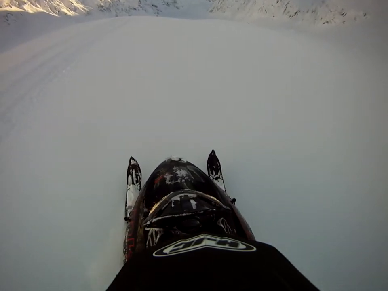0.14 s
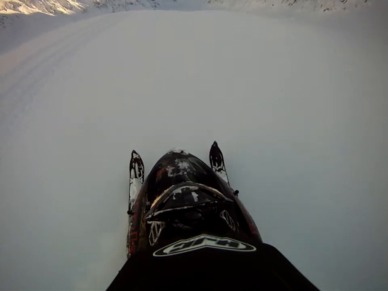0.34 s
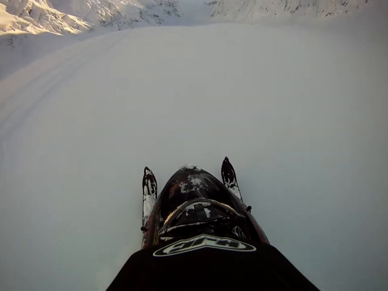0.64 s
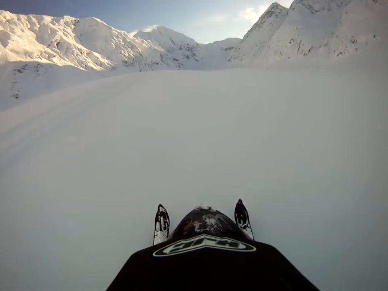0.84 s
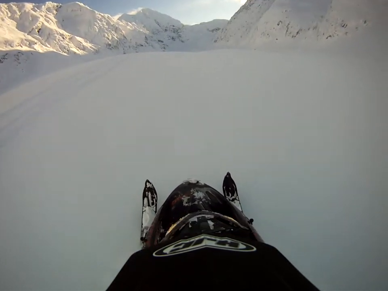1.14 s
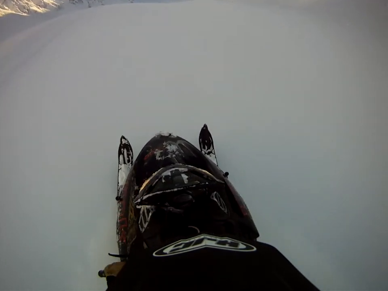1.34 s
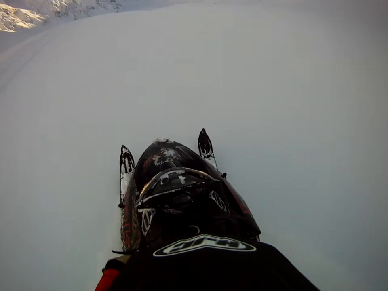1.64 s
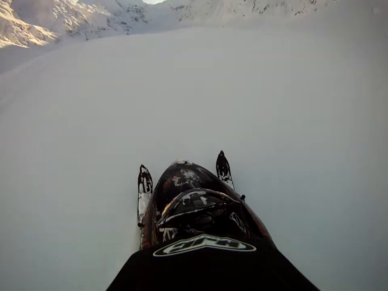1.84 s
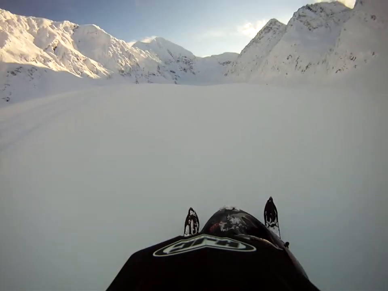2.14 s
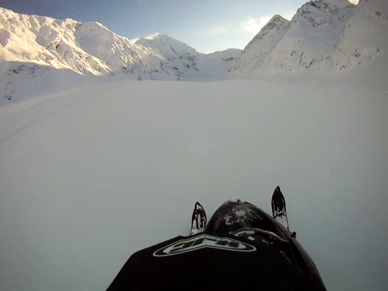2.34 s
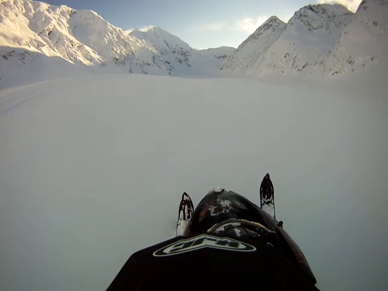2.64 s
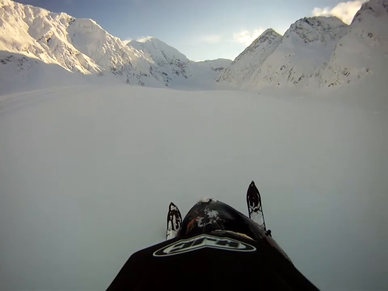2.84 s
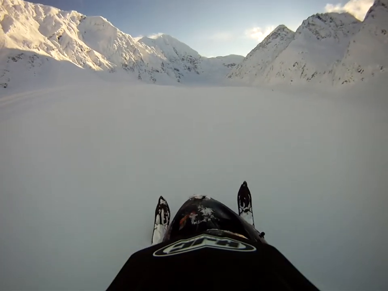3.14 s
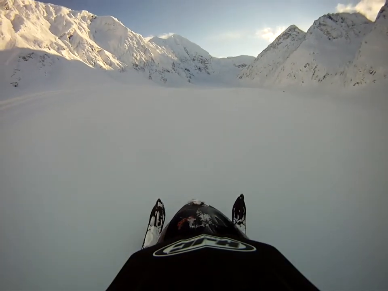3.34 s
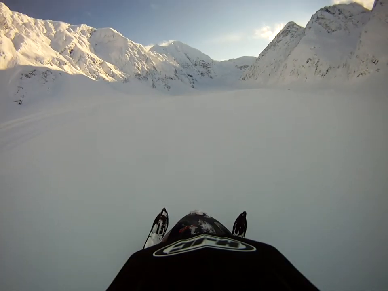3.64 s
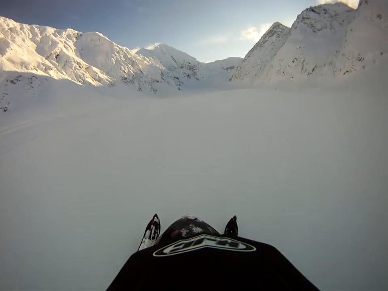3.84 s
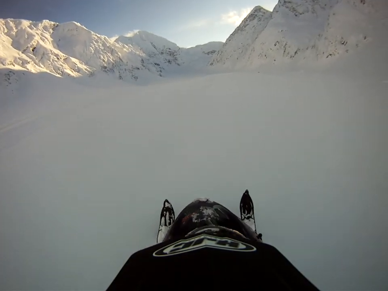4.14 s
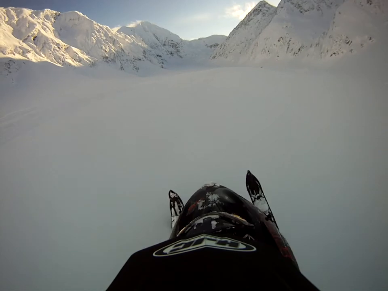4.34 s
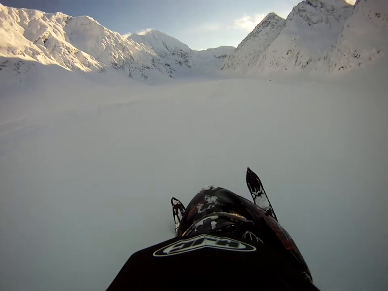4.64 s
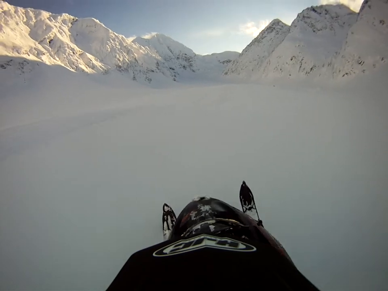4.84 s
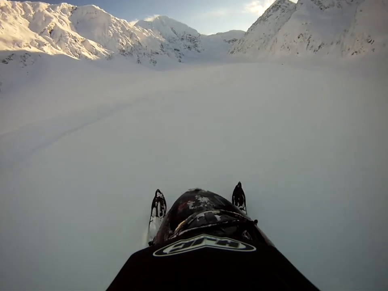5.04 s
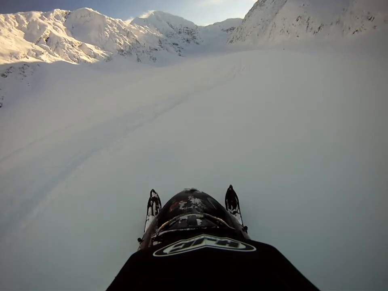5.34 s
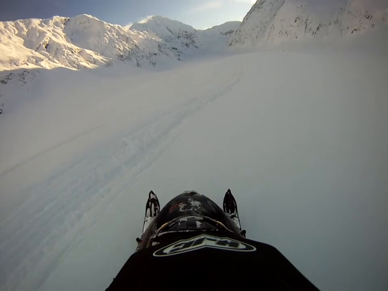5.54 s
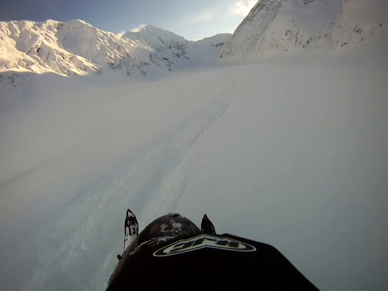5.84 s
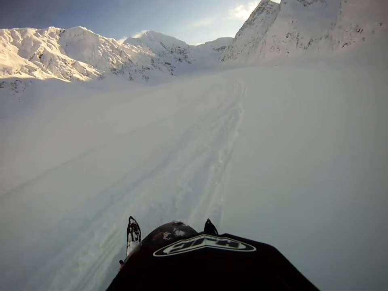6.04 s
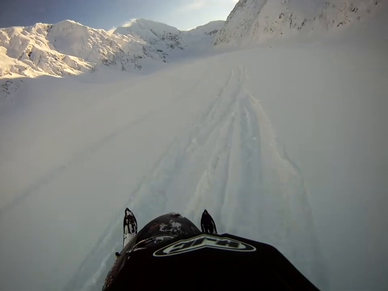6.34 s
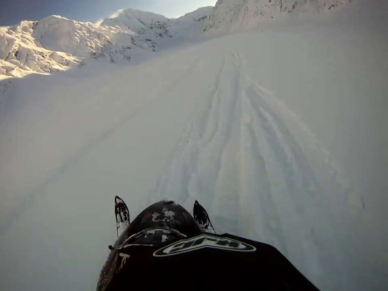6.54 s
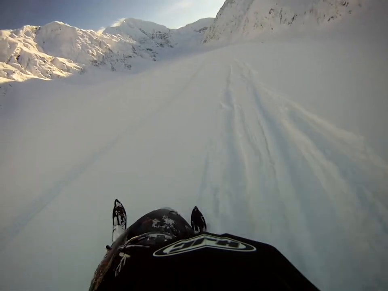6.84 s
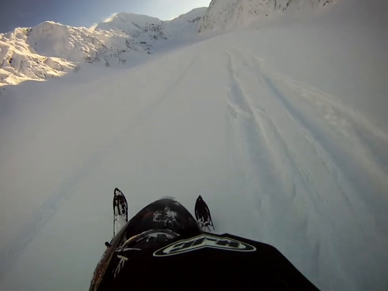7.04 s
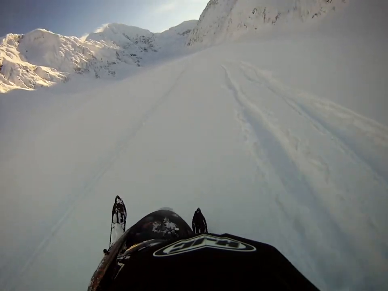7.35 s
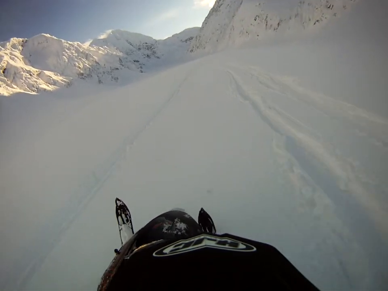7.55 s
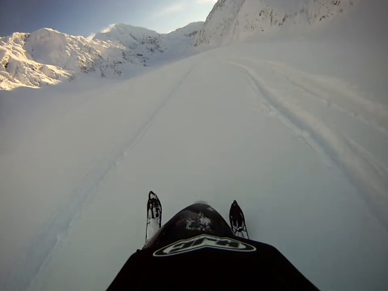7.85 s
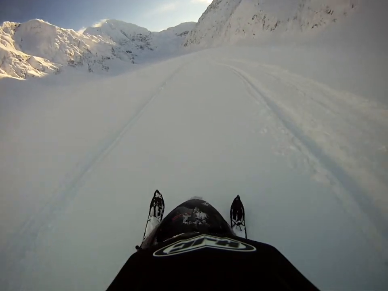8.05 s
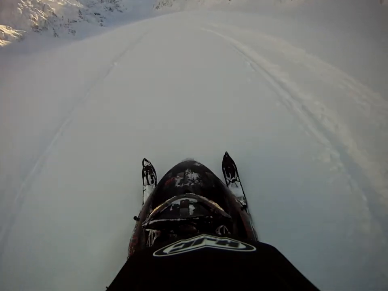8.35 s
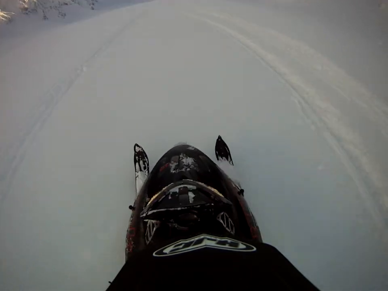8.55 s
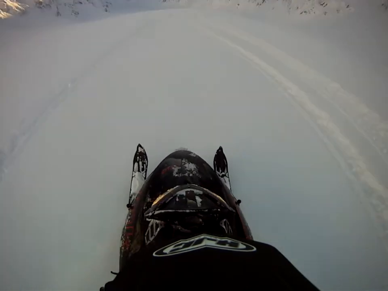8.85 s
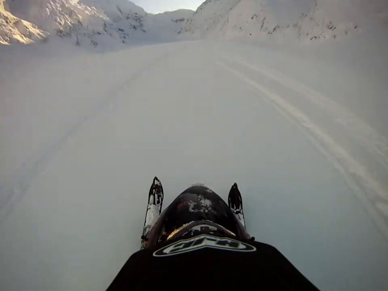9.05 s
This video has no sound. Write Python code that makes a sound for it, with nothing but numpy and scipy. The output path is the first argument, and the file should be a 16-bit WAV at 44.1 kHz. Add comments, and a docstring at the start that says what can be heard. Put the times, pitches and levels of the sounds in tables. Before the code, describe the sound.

A two-stroke snowmobile engine drones and howls at high revs, close to a small cased helmet camera. It surges higher, then the throttle snaps shut and the pitch dips with a quick rattle of knocks. It recovers unevenly and climbs again to a strained whine. Gas and track roar and low wind thumps run underneath, in open snowy mountains.

```python
"""A two-stroke twin snowmobile climbs at high revs; the microphone is a small cased camera on the rider's helmet.
From the start: crank orders drone and howl, firings ring the case near 1.5 kHz, gas and track roar, wind thumps.
At 2.4 s the throttle opens and the revs rise; at 4.7 s it snaps shut, the engine dips, and lone firings knock.
The revs sag, recover, and from 7.4 s climb again towards full throttle.
Throughout, the camera samples slowly and holds each sample, which mirrors the sound into the treble."""
import sys
import numpy as np
from scipy import signal
from scipy.fft import rfft, irfft
from scipy.io import wavfile
from scipy.ndimage import uniform_filter1d

SR = 44100
rng = np.random.default_rng(int(sys.argv[2]) if len(sys.argv) > 2 else 0)


def wrap_up_sound(samples):
    """Save the sound to the file named by the first command line argument, as 16-bit audio."""
    columns = np.atleast_2d(samples).T
    # keep every value between -1 and 1, then stretch to whole-number steps
    tamed = np.clip(columns, -1, 1)
    steps = np.round(tamed * 32767).astype(np.int16)
    wavfile.write(sys.argv[1], SR, steps)


N = 404838  # length in samples


def undb(db):
    """Gain of a level in dB."""
    return 10 ** (np.asarray(db) / 20)


def seconds():
    """Time of every sample."""
    return np.arange(N) / SR


def curve(table):
    """Second column of a table, drawn as straight lines over its times."""
    t, values = np.transpose(table)
    return np.interp(seconds(), t, values)


def colour_db(points, hz):
    """Level of a spectrum at given frequencies, interpolated over log frequency."""
    f, db = np.transpose(points)
    return np.interp(np.log(np.maximum(hz, 1)), np.log(f), db)


def coloured(x, points):
    """Filter by a spectrum, then scale to rms 1."""
    hz = np.arange(N // 2 + 1) * SR / N
    y = irfft(rfft(x) * undb(colour_db(points, hz)), N)
    return y / np.sqrt(np.mean(y ** 2))


def walk(rate):
    """Random values, one each 1 / rate s, joined by straight glides; spread about 1.4."""
    step = int(SR / rate)
    held = np.repeat(rng.standard_normal(N // step + 1), step)
    return 1.7 * uniform_filter1d(held, step)[:N]


def bump(middle, length):
    """A smooth rise and fall, 1 at the middle, 1/e half a length away."""
    return np.exp(-(2 * (seconds() - middle) / length) ** 2)


def plateau(middle, length):
    """Ramp up over a quarter of the length, hold for half, ramp down."""
    return np.clip(2 - 4 * np.abs(seconds() - middle) / length, 0, 1)


def by_throttle(throttle, levels_db):
    """Blend the eased, cruising and wide-open levels."""
    return np.interp(throttle, (0, .5, 1), levels_db)


# Crankshaft speed: t/s, rate/(turns per s)
SHAFT_RATE = [(0, 122), (.25, 120.8), (.85, 121.7), (1.2, 120.9), (1.65, 121.2), (1.98, 120.2),
              (2.3, 122.3), (2.43, 124), (2.61, 129), (2.75, 130.5), (2.95, 131.2), (3.07, 130.8),
              (3.24, 128.9), (3.4, 128.5), (3.72, 129.8), (3.9, 127.2), (4.08, 121.3), (4.27, 119.4),
              (4.66, 121.8), (4.7, 115), (4.78, 108.8), (4.89, 102), (4.96, 101.6), (5.17, 110.5),
              (5.37, 114.3), (5.55, 115.6), (5.79, 114.6), (5.96, 118), (6.15, 120), (6.34, 117.8),
              (6.75, 122), (7.22, 124), (7.4, 129.2), (7.62, 132.6), (7.85, 131.4), (8.05, 134.3),
              (8.18, 134.6), (8.4, 131.4), (8.55, 130.8), (8.87, 133.2), (9.18, 133.1)]


def crankshaft():
    """Turns per second, and the crank angle in radians that they add up to."""
    hz = curve(SHAFT_RATE)
    return hz, 2 * np.pi * np.cumsum(hz) / SR


# Throttle: t/s, opening (0 eased, .5 cruising, 1 wide open)
THROTTLE_OPENING = [(0, 0.53), (1.15, 0.55), (1.7, 0.48), (2.0, .52), (2.37, 0.58), (2.43, 0.93),
                    (3.0, 0.94), (3.3, 0.97), (3.75, 1), (3.93, 0.88), (4.02, 0.5), (4.45, 0.57),
                    (4.67, 0.25), (4.71, 0.063), (6.55, .02), (6.7, 0.39), (7.05, 0.32), (7.4, 0.86),
                    (7.62, 0.54), (7.86, 0.7), (7.93, 0.96), (8.05, 1), (8.25, 0.82), (8.6, 0.88),
                    (9.18, 0.93)]


def throttle_opening():
    """How far the throttle is open; it sets the balance of the engine and the wind rush."""
    return curve(THROTTLE_OPENING)


# Roar and wind drop together, firings less: middle t/s, length t/s, depth of the roar's drop level/dB
LULL_DIPS = [(3.85, 0.23, -4), (5.23, 0.15, 0), (5.5, 0.24, -0.5), (8.156, 0.27, -6)]


def lulls():
    """Level change in dB of the brief lulls."""
    return sum(db * bump(middle, length) for middle, length, db in LULL_DIPS)


def partial(angle, order, db, waver_db=0.5, slip=0.13, spread=0.65):
    """One multiple of the shaft rate; uneven burning makes its size and phase (slip, spread in rad) waver."""
    # even orders near the case resonance line up into one smeared pulse a firing; odd orders keep no such step
    smear = np.pi - .07 * (order - 12) ** 2
    phase = smear + spread * rng.standard_normal()
    phase = phase + (order % 2) * rng.uniform(0, 2 * np.pi)
    size = np.sqrt(2) * undb(db + waver_db * walk(25))
    return size * np.cos(order * angle + slip * walk(25) + phase)


# The multiples of the shaft rate that stand out
LOUD_ORDERS = (1, 2, 4, 6, 8, 10, 11, 12, 14, 15, 16, 18, 22, 24)
# One row per loud order, before wander and swells: eased level/dB, cruising level/dB, wide-open level/dB
LOUD_ORDER_LEVELS = [(-54, -52, -50.1), (-34.5, -32, -42.5), (-35.5, -35.5, -34.5), (-42.5, -40, -39),
                     (-48, -44, -30), (-38, -32, -22), (-39, -32, -27.6), (-34, -21.5, -14),
                     (-32.5, -34.5, -18), (-45, -24.5, -37.5), (-33, -29, -29), (-37, -38, -24),
                     (-44, -44, -32.5), (-52.9, -45.5, -26.5)]
# One order swells or fades for a moment: middle t/s, length t/s, order, change level/dB
ORDER_SWELLS = [(.95, 1.2, 12, 2.5), (1.7, .64, 16, -11), (1.994, 0.29, 12, 2), (2.295, 0.82, 4, -6),
                (2.33, .25, 2, -5), (2.33, .15, 12, -5.5), (2.46, 0.25, 8, 4.5), (2.47, .2, 24, 3),
                (2.62, 0.26, 16, 5), (2.48, .68, 6, 6.5), (2.756, 1.27, 14, -6.5), (2.78, 1.8, 18, -8),
                (2.9, 0.88, 4, 4.5), (2.92, 0.54, 1, 7), (2.97, .3, 24, 5), (3.24, 0.28, 24, -5),
                (3.3, 0.46, 6, 3.5), (3.496, 0.52, 12, -4), (3.58, 0.52, 24, 2), (3.6, 0.77, 22, -14),
                (3.616, 0.3, 8, 6.5), (3.66, .35, 2, 5), (3.83, 0.77, 18, -17), (3.876, 0.27, 10, -4),
                (3.89, 0.28, 11, -9), (3.888, 0.34, 16, -4), (4.003, 0.24, 2, -9), (4.122, 0.32, 14, -8),
                (4.29, .35, 12, 3), (4.49, .6, 15, -16), (4.52, .4, 14, 7), (4.55, 0.53, 6, 8.5),
                (4.57, 0.6, 4, 5), (4.695, .65, 2, -18), (4.8, 0.39, 1, 17), (4.84, .14, 15, 8),
                (4.88, .4, 6, -0.5), (4.94, .25, 11, 8), (4.93, .16, 14, -2), (4.987, 0.25, 4, -6),
                (5.057, .5, 12, -12), (5.155, 0.23, 6, 6.5), (5.17, 0.4, 14, 7.5), (5.32, 0.14, 16, 7),
                (5.75, 0.25, 14, 3.5), (6.1, 0.31, 16, 3), (6.3, 0.45, 6, -5), (6.402, 0.28, 2, 3),
                (6.447, 0.27, 4, 5), (6.53, 1.4, 11, -11), (6.72, .2, 12, 3.5), (6.86, 0.6, 16, 6),
                (7.02, 0.38, 6, 8.5), (7.22, .3, 2, -6), (7.339, 0.23, 18, 4), (7.4, 1.3, 10, -11),
                (7.416, 1.3, 12, -7), (7.546, 0.11, 14, 8), (7.623, 0.32, 1, 8), (7.67, .44, 11, -12),
                (7.703, 0.48, 12, -4), (7.78, .3, 14, 4), (7.786, 1.2, 2, -8), (7.883, 1.6, 6, -5.5),
                (8.12, .2, 18, -7), (8.147, 0.26, 24, -14), (8.17, .3, 2, -10), (8.19, .2, 4, -5),
                (8.3, 0.43, 10, -7), (8.38, 0.27, 12, -3), (8.548, .2, 6, 5), (8.547, 0.32, 2, 4.5),
                (8.72, .4, 16, -7), (8.9, 0.51, 11, -9), (9.11, .99, 24, -4.5)]


def tones(angle, throttle):
    """The strong orders: exhaust drone, howl of the case, whine at full throttle."""
    out = 0
    for order, levels_db in zip(LOUD_ORDERS, LOUD_ORDER_LEVELS):
        db = by_throttle(throttle, levels_db) + walk(4)
        for middle, length, which, change_db in ORDER_SWELLS:
            if round(which) == order:
                db = db + change_db * plateau(middle, length)
        out = out + partial(angle, order, db)
    return out


# Ring of the case under the firing pulses, relative: f/Hz, level/dB
FIRING_COLOUR = [(380, -21.5), (630, -23), (880, -21.5), (1130, -15.5), (1650, -8.5), (2150, -15),
                 (2450, -12.5), (2650, -24.5), (3000, -17), (3400, -22), (3700, -29), (4200, -31),
                 (4700, -27.5), (5200, -27.5), (5600, -28.5)]
# Firing strength, relative: eased level/dB, cruising level/dB, wide-open level/dB
FIRING_LEVELS = (-22, -17, -13)
# Base mismatch of the two cylinders: eased level/dB, cruising level/dB, wide-open level/dB
MISMATCH_LEVELS = (-3.5, -4, -8)
# The weaker orders rasp out together: middle t/s, length t/s, rise level/dB
RASP_RISES = [(2.88, 0.77, 6), (6.87, 0.23, 3), (7.98, 0.16, 5.5), (8.58, 1, 6)]


def firings(hz, angle, throttle, lull_db):
    """Two pulses a turn ring the case; odd orders come from the mismatch of the cylinders."""
    firing_db = by_throttle(throttle, FIRING_LEVELS) + 0.62 * lull_db
    firing_db = firing_db + sum(db * plateau(middle, length) for middle, length, db in RASP_RISES)
    mismatch_db = by_throttle(throttle, MISMATCH_LEVELS)
    out = 0
    for order in range(1, 44):
        if order not in LOUD_ORDERS:
            db = firing_db - 7.5 + colour_db(FIRING_COLOUR, order * hz) + 1.28 * walk(2.5)
            if order % 2:
                # the two pulses differ least in their sharp fronts
                db = db + mismatch_db - 0.5 - 0.096 * order
            out = out + partial(angle, order, db, waver_db=2.5, slip=0.43)
    return out


# Colour of the gas and track noise, relative: f/Hz, level/dB per Hz
ROAR_COLOUR = [(290, -32.5), (500, -22.5), (543, -20.5), (788, -20), (988, -16), (1110, -3.5),
               (1290, -10.5), (1430, 0), (1620, -6), (1880, 1.5), (2580, -8.5), (3450, -9.5), (4330, -27),
               (5270, -16.5), (5900, -28), (7670, -66), (13000, -120)]
# Course of the roar, relative: t/s, level/dB
ROAR_COURSE = [(0, -26), (1.3, -25), (1.56, -25.5), (2.4, -25), (2.7, -26), (2.9, -24), (3.7, -26.5),
               (4.7, -25.5), (5.45, -29.5), (6.14, -25.5), (6.3, -26), (6.9, -24.5), (7.8, -22.5),
               (8.0, -22.5), (8.4, -23.5), (9.18, -26.5)]


def roar(angle, change_db):
    """Gas and track noise, puffing with each firing; each band surges on its own."""
    puffs = 1 + 0.12 * np.cos(2 * angle) + 0.049 * np.cos(angle)
    noise = coloured(puffs * rng.standard_normal(N), ROAR_COLOUR)
    centres = (400, 1100, 1600, 2200, 3000, 4200, 6000)  # Hz, of overlapping bands
    spectrum, hz = rfft(noise), np.arange(N // 2 + 1) * SR / N
    out = 0
    for k in range(len(centres)):
        share = np.interp(hz, centres, np.arange(len(centres)) == k)
        surge_db = 1.12 * walk(2.94) + 0.4 * walk(12)
        out = out + undb(surge_db) * irfft(spectrum * share, N)
    return undb(curve(ROAR_COURSE) + change_db + 2.5) * out


# Gusts: peak t/s, rumble level/dB, length t/s
WIND_GUSTS = [(.15, -28, 0.15), (0.517, -37, .25), (.76, -38, 0.14), (1.3, -34, 0.17), (1.65, -42, .2),
              (2.5, -44, 0.61), (3.577, -33.5, 0.11), (4.5, -38, .2), (4.95, -44, 0.27), (5.65, -42, 0.27),
              (6.55, -36, .3), (6.79, -31.5, .15), (7.52, -32.5, 0.27), (8.02, -34, .15), (8.53, -32, .3),
              (9.1, -40, .15)]
# Colour of the wind rush, relative: f/Hz, level/dB per Hz
RUSH_COLOUR = [(12, -40), (20, -1.5), (76, -2), (189, -5.5), (248, -4.5), (315, -11.5), (499, -11),
               (576, -19), (900, -9), (1170, -37), (1980, -120)]
# Rush before its wander and lulls: eased level/dB, cruising level/dB, wide-open level/dB
RUSH_LEVELS = (-40.5, -39.5, -41.5)


def wind(throttle, lull_db):
    """Gusts thump a low resonance of the case, over a dull rush."""
    rumble = undb(-40 + 2 * walk(6.1) + lull_db)
    rumble = rumble + sum(undb(db) * bump(peak, length) for peak, db, length in WIND_GUSTS)
    resonance = [(45, -20), (68, -11.5), (78, 9.5), (90, -15), (130, -29.5)]  # f/Hz, level/dB
    thump = coloured(rng.standard_normal(N), resonance)
    rush_db = by_throttle(throttle, RUSH_LEVELS) + 1.7 * walk(5) + 1.6 * lull_db
    rush = coloured(rng.standard_normal(N), RUSH_COLOUR)
    return rumble * thump + undb(rush_db) * rush


# The throttle snaps shut: depth of the gap level/dB, knock level/dB, knock fade time constant t/s
THROTTLE_LIFT = (-8, -10.5, .17)
# Start of the gap t/s, first lone firing t/s
LIFT_TIMES = (4.684, 4.698)


def missed_beat():
    """Level change in dB as both cylinders miss a beat when the throttle shuts."""
    (shut, back), depth_db = LIFT_TIMES, THROTTLE_LIFT[0]
    return np.interp(seconds(), [shut - .003, shut, back, back + .02], [0, depth_db, depth_db, 0])


# Modes of the case that a knock rings: f/Hz, relative level/dB, fall by 60 dB t/s
KNOCK_MODES = [(1480, -3, .028), (1330, -10, .03), (1910, -13, .03)]


def knocks(angle):
    """Off throttle only one cylinder fires: one knock a turn, fading away."""
    start, (_, knock_db, fade) = LIFT_TIMES[1], THROTTLE_LIFT
    since = seconds() - start
    turns = np.ceil((angle - angle[int(start * SR)]) / (2 * np.pi))
    new_turn = np.diff(turns, prepend=turns[0]) > 0
    blows = new_turn * (since > 0) * np.exp(-np.abs(since) / fade)
    blows = blows * undb(knock_db + 1.5 * walk(120))
    t = np.arange(SR // 10) / SR
    ring = sum(undb(db - 60 * t / t60) * np.sin(2 * np.pi * f * t) for f, db, t60 in KNOCK_MODES)
    onset = 1 - np.exp(-t / .0006)
    return signal.fftconvolve(blows, ring * onset)[:N]


def scene():
    """Engine, roar, wind and knocks, summed at the one helmet microphone."""
    hz, angle = crankshaft()
    throttle, lull_db, gap_db = throttle_opening(), lulls(), missed_beat()
    engine = tones(angle, throttle) + firings(hz, angle, throttle, lull_db)
    mix = engine * undb(gap_db)
    mix = mix + roar(angle, lull_db + gap_db / 3)
    mix = mix + wind(throttle, lull_db)
    mix = mix + knocks(angle)
    return mix[None]


def record(dry):
    """Round the peaks, sample at 12 kHz, hold each sample (images mirror around 12 kHz), cut the top."""
    rounded = np.tanh(.9 * dry) / .9
    slow = signal.resample_poly(rounded, 40, 147, axis=1)  # to 12 kHz
    held = np.repeat(slow, 4, axis=1)  # 48 kHz
    held = signal.resample_poly(held, 147, 160, axis=1)[:, :N]  # back to SR
    held = np.pad(held, ((0, 0), (0, N - held.shape[1])))
    top_cut = signal.ellip(12, .2, 90, 15350, fs=SR, output="sos")  # low-pass, edge in Hz
    return signal.sosfilt(top_cut, held)


dry = scene()
out = record(dry)
wrap_up_sound(out)
```